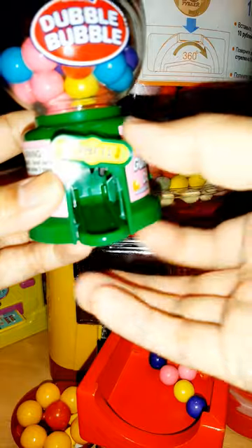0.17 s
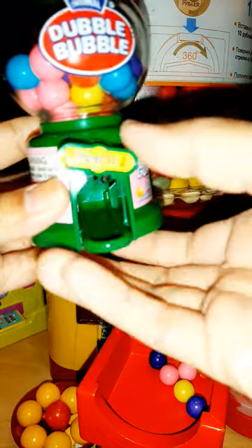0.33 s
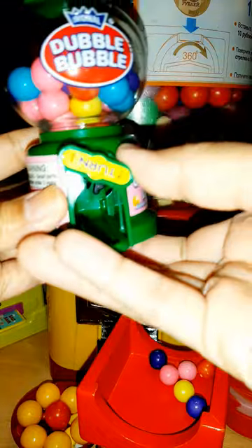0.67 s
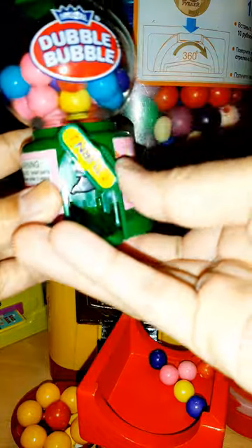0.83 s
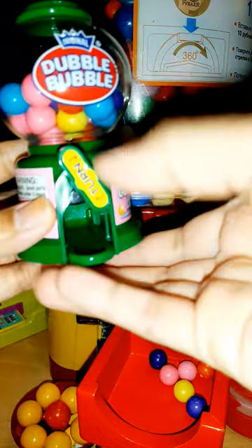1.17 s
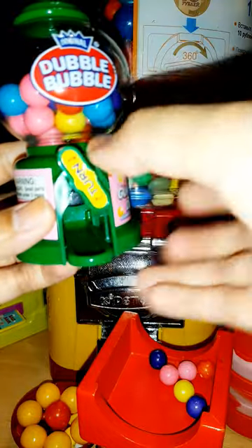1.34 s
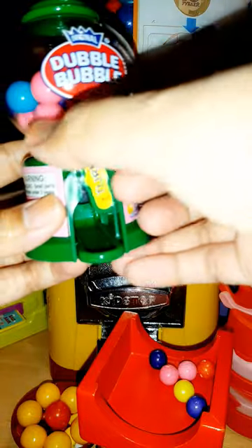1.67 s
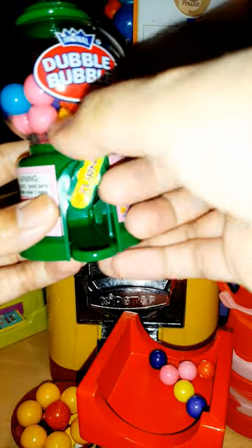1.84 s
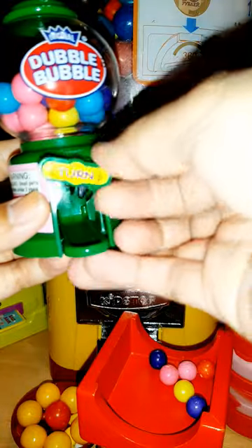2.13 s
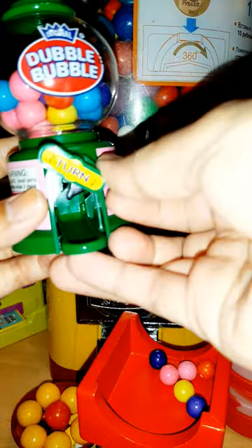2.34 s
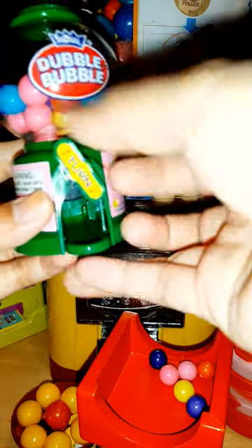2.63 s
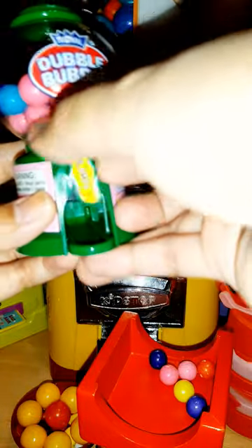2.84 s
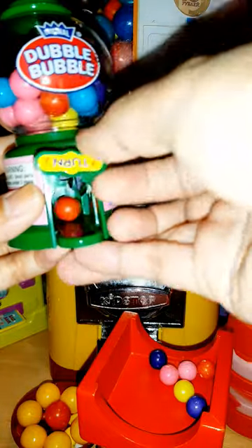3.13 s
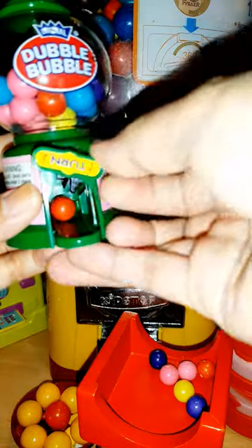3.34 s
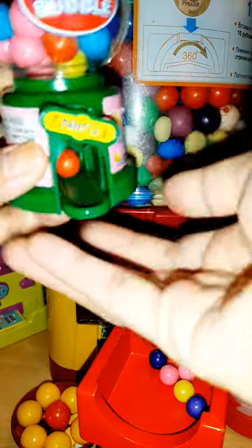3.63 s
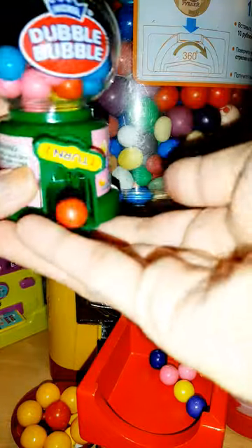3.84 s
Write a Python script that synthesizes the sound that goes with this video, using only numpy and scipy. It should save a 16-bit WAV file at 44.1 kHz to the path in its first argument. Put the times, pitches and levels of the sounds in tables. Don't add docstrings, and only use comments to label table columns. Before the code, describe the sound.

Dry plastic clicks from a hand-turned toy knob come in uneven clusters, then hard sugar balls tumble brightly against the thin shell and rattle again at the end; close stereo phone pickup, faint hiss and low rumble.

```python
import sys
import numpy as np
from scipy import signal
from scipy.fft import rfft, irfft, next_fast_len
from scipy.io import wavfile

SR = 44100
rng = np.random.default_rng(int(sys.argv[2]) if len(sys.argv) > 2 else 0)


def file_out(sig):
    cols = np.atleast_2d(sig).T
    lim = np.clip(cols, -1, 1)
    pcm = np.round(lim * 32767).astype(np.int16)
    wavfile.write(sys.argv[1], SR, pcm)


def volts(x):
    e = np.asarray(x, float) / 20
    return 10 ** e


N = 176400

CONTACT_S = 0.0069
PANEL_DB = -0.5


def unit(x):
    return x / np.sqrt(np.mean(x ** 2) + 1e-20)


def along(points, hz):
    f, v = np.transpose(points)
    return np.interp(np.log(hz + 1), np.log(f + 1), v)


def filtered(x, response):
    m = next_fast_len(x.shape[-1] + 8192)
    return irfft(rfft(x, m) * response(np.fft.rfftfreq(m, 1 / SR)), m)[..., :x.shape[-1]]


def port_noise():
    return rng.standard_normal((2, N)) + 0.45 * rng.standard_normal((1, N))


def suppressor_db():
    # time_s, level_db
    hiss_level = [(0.062, -130), (0.072, -70), (1.1, -68.5), (1.25, -70.5), (1.36, -83), (2.53, -82),
                  (2.56, -87.5), (4.0, -90.5)]
    return np.interp(np.arange(N) / SR, *np.transpose(hiss_level))


def hiss():
    # pitch_hz, density_db (per Hz)
    air = [(250, -50), (560, -23), (980, -9.5), (2000, -3), (3500, -13.5), (7300, -18.5), (8000, -52),
           (16000, -55)]
    left_db, right_db = -35.5, 0
    noise = unit(filtered(port_noise(), lambda f: volts(along(air, f))))
    return noise * volts([[left_db], [right_db]]) * volts(suppressor_db() + 15.5)


def rumble():
    # pitch_hz, density_db (per Hz)
    low_colour = [(15, -53), (25, -24.5), (102, -9.5), (365, -17.5), (400, -22.5), (520, -71.5)]
    return volts(-79.5) * unit(filtered(port_noise(), lambda f: volts(along(low_colour, f))))


def preamp():
    flat_db, fizz_db = -71, -81.5

    def colour(f):
        return volts(fizz_db) * (f / 10000) ** 2 + volts(flat_db) / (1 + (f / 5000) ** 2)

    return filtered(port_noise(), colour) * volts((suppressor_db() + 76.0) * 0.1)


def background():
    start_s = 0.065
    is_open = np.arange(N) > start_s * SR
    return hiss() + (rumble() + preamp()) * is_open


def ring(f, modes, luck):
    strength_scatter_db, pitch_scatter = 3, 0.031
    total = 0
    for k, (pitch, width, db) in enumerate(modes):
        c = pitch * (1 + pitch_scatter * luck[1, k])
        strength = (-1) ** k * volts(db + strength_scatter_db * luck[0, k])
        total = total + strength * 1j * f * c / (c * c - f * f + 1j * f * width)
    return total


def body(f, hollow_db, panel_db, bright_db, s):
    # pitch_hz, width_hz, level_db
    hollow_modes = [(500, 30, 1), (640, 130, -2)]
    globe_modes = [(1234.3, 59.7, 5)]
    panel_modes = [(1738.6, 85, -1), (1943, 192, 1), (2462, 316, -9)]
    wall_modes = [(2990, 410, -6.5), (3678, 119, -3.5)]
    rim_modes = [(4363, 402, 2), (5602, 104, -8), (6070, 180, -6.5), (7354, 525, -1.5), (9440, 1820, -9.5),
                 (14200, 2000, -9)]
    grip_shift = (-.02, .02)
    crack_db, low_cut_hz = 0.5, 660

    luck = rng.standard_normal((5, 2, 6))
    grip = 1 + np.interp(s, (0, N / SR), grip_shift)
    globe = ring(f / grip, globe_modes, luck[1] / 2)
    panels = volts(panel_db) * ring(f, panel_modes, luck[4])
    wall = volts((bright_db + panel_db) / 2) * ring(f, wall_modes, luck[3])
    crack = volts(crack_db) * 1j * f / (2000 + 1j * f)
    rim = volts(bright_db) * (ring(f, rim_modes, luck[2]) + crack)
    cavity = volts(hollow_db) * ring(f, hollow_modes, luck[0] / 4)
    low_cut = (1j * f / (low_cut_hz + 1j * f)) ** 2
    return (globe - panels + wall + rim) * low_cut - cavity


def clicks():
    # brightness_db,
    # panels_db, hollow_db
    contacts = [(0.599, -44, -23, -13, -26), (0.632, -27.5, -4.5, -7.5, -15), (0.64, -31.5, -4, 3, -8),
                (0.66, -38, -34, -16, -21), (0.745, -49, -23, -11, -28), (0.782, -42.5, -8, 9, -22),
                (0.801, -18.5, -2, 12, -34), (0.806, -22, 2, 9, -26), (0.825, -14, -17, -4, -6),
                (0.839, -30, -21, 19, -20), (0.851, -31, 11, 5, -15), (0.859, -27.5, -17, -6.5, -15.5),
                (1.143, -31, -26, 5.5, -22), (1.203, -20.5, -9, 9.5, -11), (1.641, -22, -18, 6.5, -26),
                (1.652, -24, -19, 5.5, -7), (1.661, -34, -5, -14, -26), (1.674, -31, -11, -2.5, -4),
                (1.712, -32.5, -28, -3.5, -25), (1.738, -32, -18, 3, -9), (1.762, -16.5, -9.5, 4.5, -9.5),
                (1.776, -15.5, -1.5, -2, -32), (1.827, -23.5, -9.5, -0.5, -16.5),
                (1.871, -32, 16, -14, -8.5), (1.89, -26, -22, 1, -9.5), (1.908, -29, -10.5, -10.5, -2),
                (1.928, -31.5, -20, -15, -11),
                (1.946, -21, 2.5, -2, -3), (1.955, -18, -18, -7, -16), (1.969, -14.5, 3.5, 7.5, -20),
                   (1.978, -18.5, -12, 4, -6.5), (1.985, -17.5, -2.5, -4, -6), (1.996, -18, -16, 2, -17.5),
                   (2, -20.5, -14, -10, -32), (2.012, -26, -4, -9, -3), (2.017, -29, -14, -14, -16),
                   (2.079, -36, -14.5, 0.5, -9), (2.141, -27.5, -21, -10, -31), (2.168, -27.5, -8, 8, -22),
                   (2.169, -19, -7.5, -1.5, -4), (2.174, -20.5, -40, -5, -26), (2.185, -16, -7, -1, -22),
                   (2.193, -23.5, -8, 8.5, -9), (2.214, -25.5, -15, -5, -10), (2.233, -24, -5.5, -9, -9),
                   (2.247, -26.5, -33, -3, -19), (2.282, -34.5, -11, -15, -5), (2.404, -49, -31, -16, -21),
                   (2.415, -41.5, 0, -24, -18), (2.43, -25, -8, -6, -14), (2.437, -21, -10.5, 6.5, -3.5),
                   (2.458, -40, 14, -14, -10), (2.603, -51.5, -1, 8, -6), (2.624, -55, 1, 2, -10),
                   (2.682, -49.5, -15, 1.5, -5), (2.709, -34, -7, 4, -22), (2.767, -16.5, -3, 9.5, -20),
                (2.835, -35, -12.5, 1.5, -34), (2.898, -38, -16, 7, -14), (2.911, -17, -1.5, 2.5, -16),
              (2.92, -26.5, -2, 7, -10), (2.928, -16, -8, 2, -14), (2.936, -10.5, 0, 1, -7),
              (2.959, -12.5, -3, -2.5, -10), (2.97, -25.5, -1, -4, -19), (2.981, -6.5, -3.5, -1.5, -19),
              (2.991, -14.5, -6.5, 5, -1), (3.013, -10, 1, 1.5, -5), (3.021, -5.5, -6.5, 9, -24),
              (3.032, -15, -10, 4, -9.5), (3.041, -10.5, -17.5, -13, -23), (3.05, 0, -6.5, 3.5, -12),
              (3.06, -14.5, -9.5, -8.5, -18), (3.072, -17, -5, -2, -23), (3.088, -4.5, -7, 5.5, -20),
              (3.1, -15, 0, 10.5, -18), (3.11, -11.5, -5.5, 8.5, -10), (3.172, -28.5, -7, 9, -1),
              (3.192, -34.5, -14.5, -2.5, -14), (3.214, -17, -2, 1.5, -19), (3.224, -31.5, -13, -8, -22),
              (3.236, -24, -1.5, 7, -22), (3.262, -15, 5.5, -5.5, -17), (3.273, -18, -9, 7.5, -9.5),
              (3.297, -23.5, -1, 6, 0), (3.398, -42.5, -31, -2.5, -16), (3.429, -50.5, -20.5, -2, -2),
                (3.542, -36, -38.5, 11.5, -25), (3.57, -46, -2.5, 13.5, -21.5), (3.714, -26.5, -22, 6.5, -6),
             (3.722, -27.5, -7.5, -0.5, -12.5), (3.733, -12, 0.5, -1.5, -17), (3.742, -20, -10, 1, -15),
             (3.783, -22.5, -20, -2, -10), (3.794, -14, -1.5, -2, -16), (3.811, -12, -6.5, -1, -28),
             (3.821, -11.5, -8.5, 1, -11.5), (3.83, -4, 2, 6, -11), (3.836, -8.5, -8, 5, -31),
             (3.849, -6.5, -7, -3, -20), (3.856, -18, -5, 11, -2), (3.866, -7.5, 0.5, -2, -33),
             (3.872, -3, 5, 7, -20), (3.882, -15.5, 1, -3, -11), (3.897, -11, 6.5, 6.5, -39),
             (3.915, -13, 1, 2, -22), (3.928, -25, -11, -3, -30)]
    rise_s, chatter_s, chatter_db = 0.00079, 0.067, -20.5
    hit_db, hollow_trim_db, bright_trim_db = -7, -1.5, -8
    scatter_db, scatter_hz = 1, 4000

    t = np.arange(SR // 8) / SR
    decay = volts(-60 * t / CONTACT_S) + volts(chatter_db - 60 * t / chatter_s)
    shape = decay * (1 - np.exp(-t / rise_s))
    out = np.zeros((2, N + SR))
    for s, db, bright_db, panel_db, hollow_db in contacts:
        noise = rng.standard_normal((3, len(t))) * shape
        own = filtered(noise[1:], lambda f: volts(scatter_db) * 1j * f / (scatter_hz + 1j * f))
        hit = filtered(noise[0] + own, lambda f: body(
            f, hollow_db + hollow_trim_db, panel_db + PANEL_DB, bright_db + bright_trim_db, s))
        onset_rms = np.sqrt(np.mean(hit[:, :SR // 300] ** 2))
        out[:, round(s * SR):][:, :len(t)] += volts(db + hit_db) * hit / onset_rms
    return out[:, :N]


def stir():
    # middle_s, half_length_s, level_db
    shifts = [(0.636, 0.027, -50.5), (0.829, 0.055, -49), (1.081, 0.1, -65.5), (1.235, 0.055, -65.5),
              (1.547, 0.059, -66), (1.701, 0.07, -59.5), (1.898, 0.037, -42), (1.985, 0.052, -47.5),
              (2.212, 0.15, -53), (2.428, 0.15, -63.5), (2.952, 0.089, -47), (3.028, 0.11, -32),
              (3.281, 0.026, -42.5), (3.571, 0.014, -67), (3.739, 0.028, -37.5), (3.854, 0.079, -31.5)]
    grains_per_s, grain_spread_db = 900, 1.5
    hollow_db, bright_db = -11.5, -14

    t = np.arange(SR // 2) / SR
    middle = t.mean()
    contact = volts(-60 * t[:300] / CONTACT_S)
    out = np.zeros(N + SR)
    for s, half, db in shifts:
        draw = rng.random((2, len(t)))
        impulses = (draw[0] < grains_per_s / SR) * volts(-grain_spread_db * np.log(draw[1]))
        grains = np.convolve(impulses, contact)[:len(t)]
        swell = np.exp(-((t - middle) / half) ** 4)
        push = unit(grains * rng.standard_normal(len(t))) * swell
        sound = unit(filtered(push, lambda f: body(f, hollow_db, PANEL_DB, bright_db, s)))
        out[round((s - middle) * SR):][:len(t)] += volts(db) * sound * np.sqrt(2 * half / t[-1])
    return out[:N]


def tick():
    # start_s, right_peak_db, left_over_right_db
    ticks = [
        (2.544, -8.5, -48),
    ]
    pitch_hz, width_hz = 1500, 1300
    x = np.zeros((2, N))
    for s, db, left_db in ticks:
        x[:, round((s + 0.001) * SR)] = volts([db + left_db + 18.5, db + 12.5])

    def thud(f):
        damping = 1j * f * width_hz
        return damping / (pitch_hz ** 2 - f * f + damping) / (1 + (f / 5000) ** 4)

    return filtered(x, thud)


def room(x):
    # pitch_hz, t60_s
    decay = [(300, .25), (2000, .22), (12000, .13)]
    hz, t, z = signal.stft(rng.standard_normal((2, SR // 3)), SR, nperseg=256)
    fade = volts(-60 * t / along(decay, hz)[:, None])
    tail = signal.istft(z * fade, SR, nperseg=256)[1]
    return signal.fftconvolve(x, tail / np.linalg.norm(tail[0]), axes=1)[:, :N]


def at_ports(x):
    # pitch_hz, left_over_right_db
    balance = [(100, -19), (200, 18.5), (400, 9.5), (700, 20), (1290, -5.5), (2400, -2.5), (4400, 7.5),
               (15000, 6.5)]
    # pitch_hz, lead_s
    lead = [(1500, .00022), (2300, .00036)]
    side = np.array([[1], [-1]])

    def response(f):
        return volts(side * along(balance, f) / 2) * np.exp(1j * np.pi * side * f * along(lead, f))

    return filtered(x, response)


def microphone(x):
    ceiling, cut_hz = 0.95, 98
    jolt_db, jolt_hz = -35.5, 70
    held = x / (1 + np.abs(x / ceiling) ** 8) ** (1 / 8)
    loudness = np.abs(held).mean(0)
    jolt = filtered(loudness, lambda f: volts(jolt_db) * (1j * f / jolt_hz) ** 2 / (1 + 1j * f / jolt_hz) ** 4)
    return filtered(held, lambda f: (1j * f / (cut_hz + 1j * f)) ** 2) + jolt


def scene():
    room_db = -15
    toy = clicks() + stir()
    near = at_ports(toy + volts(room_db) * room(toy)) + tick()
    return microphone(near) + background()


def top_cut(x):
    return signal.sosfilt(signal.butter(12, 17140, fs=SR, output="sos"), x)


def record(dry):
    top_hz = 16000
    mix = filtered(dry, lambda f: 0.78 * volts(-32.0 * np.clip((f - top_hz) / 200 + 1, 0, 1)))
    return top_cut(mix)


dry = scene()
out = record(dry)
file_out(out)
```